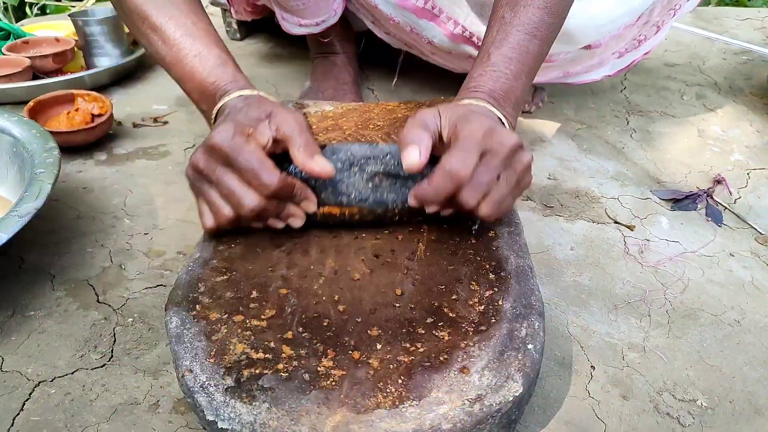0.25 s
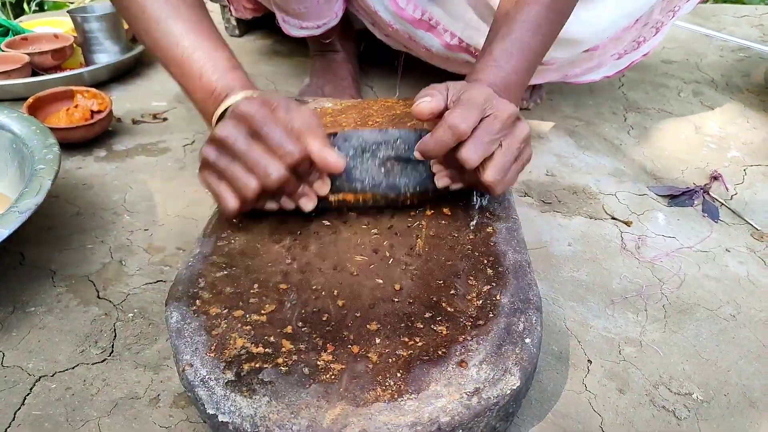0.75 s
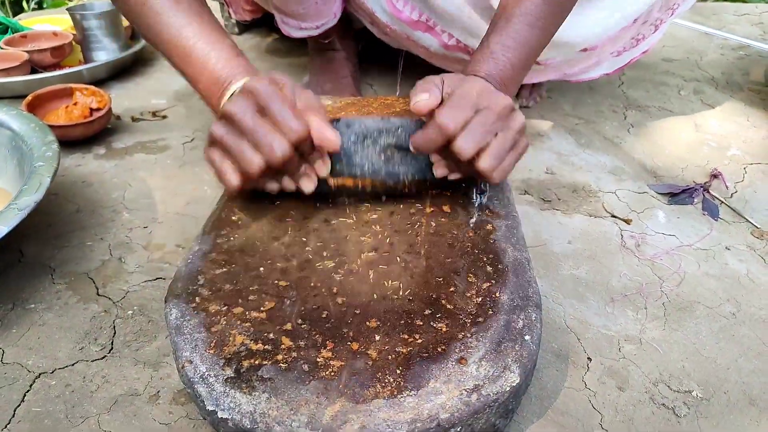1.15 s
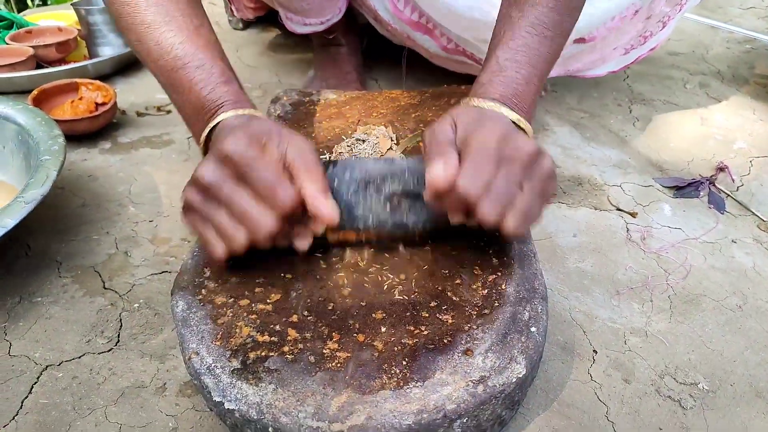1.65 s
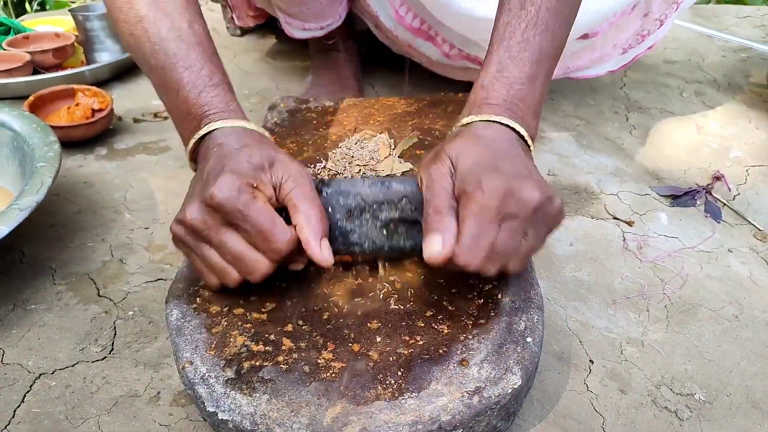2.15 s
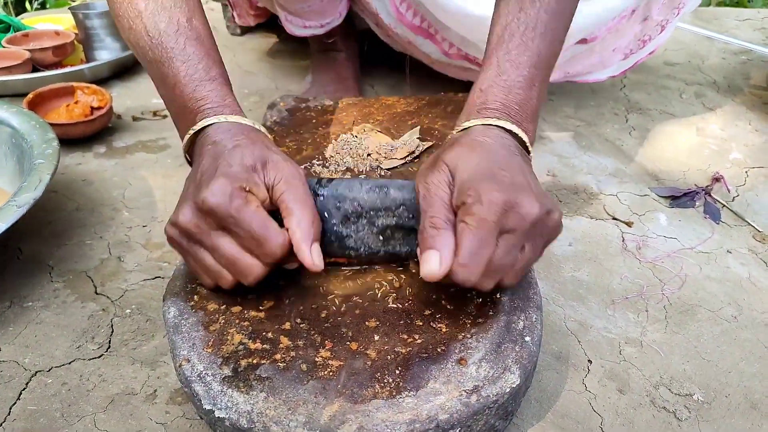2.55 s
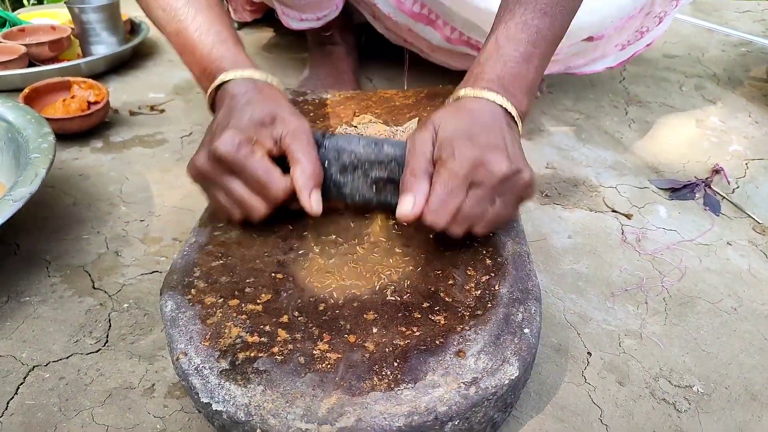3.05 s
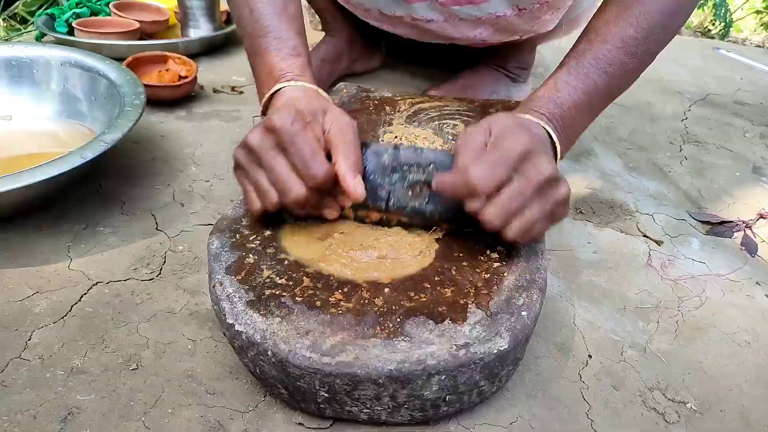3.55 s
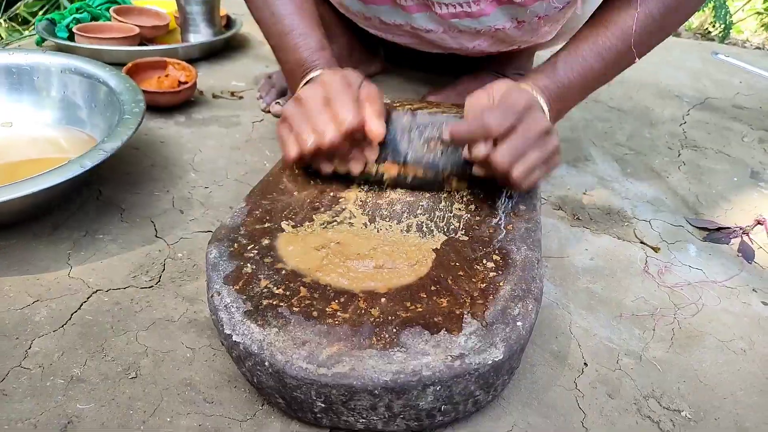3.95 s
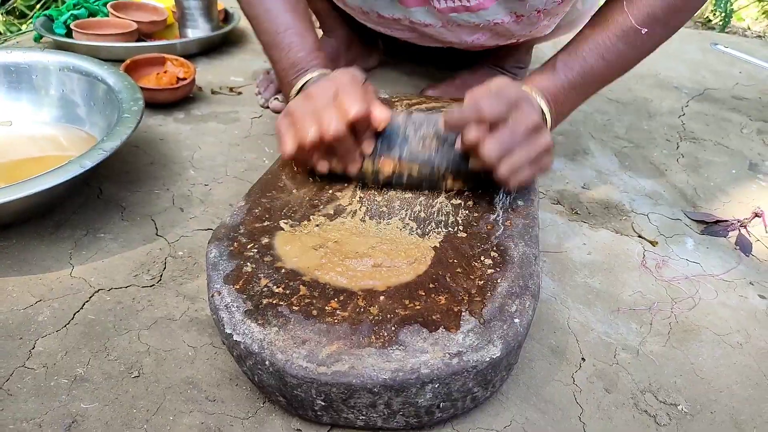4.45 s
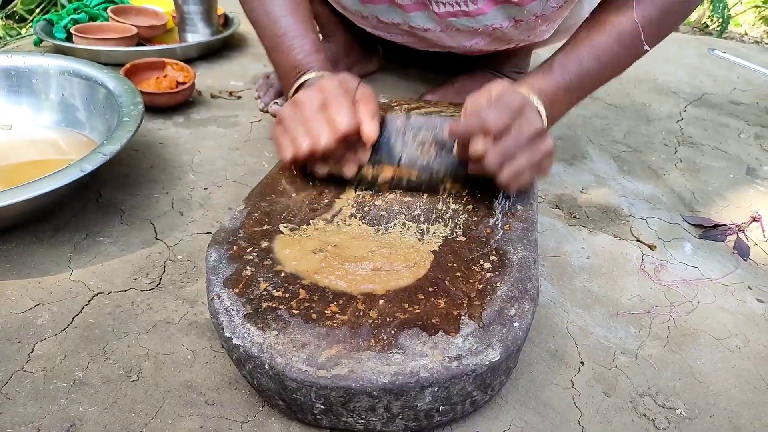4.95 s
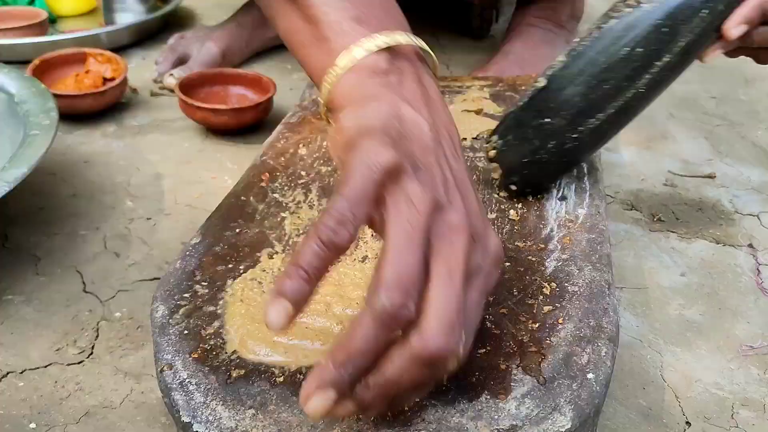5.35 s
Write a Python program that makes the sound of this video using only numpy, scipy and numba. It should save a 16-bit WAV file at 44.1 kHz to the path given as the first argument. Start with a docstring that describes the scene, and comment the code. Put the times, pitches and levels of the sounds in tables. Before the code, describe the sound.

Close up outdoors, a stone roller grinds seeds on a pitted stone slab in quick back-and-forth strokes. Gritty mid-high hiss swells and sinks with each stroke, with hard stony clacks and a hollow ring, over low slab rumble. Later strokes turn slower and wetter, a faint low hum enters, then the sound drops out briefly and returns as wind puffs over faint air.

```python
"""A stone roller is pushed back and forth over a stone slab, close to a phone with two microphone ports.
Coloured noise grains make the grit hiss; lumpier grains drive resonances, so the rubbed stones ring.
The roller skips over the pitted face as short blows into the same modes; the slab rumbles and knocks below.
Behind lie outdoor air as shaped noise, a low hum of sines that joins later, a short silence and puffs of wind."""
import sys
import numpy as np
from scipy import signal
from scipy.fft import rfft, irfft
from scipy.io import wavfile
from scipy.ndimage import uniform_filter1d
from numba import njit

SR = 44100
rng = np.random.default_rng(int(sys.argv[2]) if len(sys.argv) > 2 else 0)


def decibels_to_gain(level_db):
    """Convert a level in decibels to a linear amplitude gain (20 dB per decade)."""
    exponent = np.asarray(level_db, float) / 20
    return 10 ** exponent


def generate_wav(signal):
    """Clip the signal to [-1, 1] and save it as 16-bit WAV at the path in sys.argv[1]."""
    frames = np.transpose(np.atleast_2d(signal))
    scaled = np.clip(frames, -1, 1) * 32767
    pcm = np.round(scaled).astype(np.int16)
    wavfile.write(sys.argv[1], SR, pcm)


N = 247401
T = np.arange(N) / SR
F = np.maximum(np.arange(N // 2 + 1) * SR / N, 1)
SLOW = T[::32]  # moments at which the slow controls are worked out


def unit(x):
    """Scale to rms 1."""
    return x / np.sqrt(np.mean(x ** 2))


def along(table):
    """A (frequency [Hz], value) table read at every frequency, on a log scale."""
    hz, value = np.transpose(table)
    return np.interp(np.log(F), np.log(hz), value)


def curves(table, at=T):
    """A (time [s], value) table as a curve in time."""
    return np.interp(at, *np.transpose(table))


def colour(x, table):
    """Give a flat sound the spectrum of a (frequency [Hz], level [dB]) table, at rms 1."""
    return unit(irfft(rfft(x) * decibels_to_gain(along(table)), N))


@njit
def svf(x, hz, width):
    """Resonance with moving centre and width, gain 1 at the centre."""
    y, b, l = np.empty(len(x)), 0., 0.
    for i in range(len(x)):
        g, k = np.tan(np.pi * hz[i] / SR), width[i] / hz[i]
        v = (b + g * (x[i] - l)) / (1 + g * (g + k))
        b, l, y[i] = 2 * v - b, l + 2 * g * v, k * v
    return y


def band(x, hz, width):
    """One resonance; centre and width are numbers or curves."""
    return svf(x, hz + 0. * x, width + 0. * x)


def modes(x, table, tune=1, damp=0):
    """Ring a set of modes; extra damping [Hz] shortens them without making them louder."""
    out = 0
    for hz, width, db in table:
        out = out + decibels_to_gain(db) * band(x, tune * hz, width + damp) * width / (width + damp)
    return out


def walk(rate):
    """Random levels held 1 / rate s and slewed; spread near 1."""
    k = int(SR / rate)
    return uniform_filter1d(np.repeat(rng.standard_normal(N // k + 1), k), k)[:N]


def grains(spread_db, flutter_db, rate):
    """Crushed grains: noise with some large samples, whose density flutters; one common flutter, two draws."""
    large_db = spread_db * np.minimum(rng.exponential(size=N), 4)
    size = decibels_to_gain(large_db + flutter_db * np.clip(walk(rate), -2, 1.3))
    return size * rng.standard_normal((2, N))


def treble_warble(pair, dip_db, wide_db):
    """Lay a warble over a sound: narrow patches of its treble drop out, wide ones swell and fade."""
    hz, _, spec = signal.stft(pair, SR, nperseg=512)
    field = rng.standard_normal((2,) + spec.shape[1:])
    narrow = unit(uniform_filter1d(uniform_filter1d(field[0], size=2, axis=0), size=6, axis=1))
    wide = unit(uniform_filter1d(uniform_filter1d(field[1], size=14, axis=0), size=8, axis=1))
    treble = np.clip(hz[:, None] / 4000, 0, 1)
    warble_db = treble * (dip_db * np.minimum(narrow, 1.3) + wide_db * wide)
    return signal.istft(spec * decibels_to_gain(warble_db), nperseg=512)[1][:, :N]


# Colour balance of the two ports: (frequency [Hz], left minus right [dB])
PORT_TILT = [(60, 1), (110, 0.5), (200, -4), (380, -2), (700, 2.5), (1290, 2.5), (2380, -2.6), (4400, -4.5),
             (8120, -4), (15000, -9.5)]
# Likeness of the two ports: (frequency [Hz], share of amplitude common to both [0-1])
PORT_LIKENESS = [(30, 0.21), (70, 0.86), (150, 1), (600, 0.78), (1400, 0.96), (2500, 0.18), (5000, 0.21),
                 (12000, 0.05)]


def ports(pair, lag_ms):
    """Left hears the first draw; right hears it later, mixed with an unrelated draw where the ports differ."""
    a, b = rfft(pair)
    common = np.clip(along(PORT_LIKENESS), 0, 1)
    late = a * np.exp(-2j * np.pi * F * lag_ms / 1000)
    right = common * late + np.sqrt(1 - common ** 2) * b
    tilt = along(PORT_TILT) / 2
    return irfft(np.array([a * decibels_to_gain(tilt), right * decibels_to_gain(-tilt)]), N)


# Colour of the outdoor air: (frequency [Hz], relative level per Hz [dB])
AIR_COLOUR = [(12, -39.5), (20, 14), (181, 12), (405, -38.5), (1140, -8.5), (1340, -26), (1590, -24),
              (3370, -15.5), (4970, -11), (6220, -14.5), (7560, -16.5), (13600, -32), (15600, -45.5)]


def outdoor_air():
    """Open-air noise: shaped hiss at a wavering level, with a treble warble laid over it."""
    hiss = treble_warble(rng.standard_normal((2, N)), 8.7, 0.85)
    level_db = -61.5 + 3.5 * walk(19.0)
    return np.array([colour(v, AIR_COLOUR) for v in hiss]) * decibels_to_gain(level_db)


# Partials of the hum: (mean frequency [Hz], relative mean level [dB])
HUM_PARTIALS = [(48.3, 0), (96.6, 7), (193, -9.5)]
# Loudness of the hum: (time [s], level [dB])
HUM_LEVEL = [(3.5, -92), (3.644, -64.5), (3.846, -59.5), (4.36, -57), (4.556, -63.5), (4.742, -55),
             (4.96, -56), (5.27, -54.5), (5.36, -55)]


def low_hum():
    """Three sines whose shared pitch and separate levels waver."""
    turn = 2 * np.pi * np.cumsum(1 + 0.009 * walk(11)) / SR
    hum = unit(sum(decibels_to_gain(db + 4.7 * walk(42)) * np.sin(hz * turn) for hz, db in HUM_PARTIALS))
    return hum * decibels_to_gain(np.interp(T, *np.transpose(HUM_LEVEL), left=-99, right=-99))


# Gust level before panning: (time [s], level [dB])
GUST_LEVEL = [(5.41, -53), (5.472, -69.5), (5.49, -40), (5.542, -60), (5.562, -58), (5.61, -54)]
# Single puffs before panning:
# (time [s], level [dB], time scale [ms], signed factor on the peak: positive pushes, negative pulls)
WIND_PUFFS = [(5.481, -38.5, 6.8, -1.36), (5.518, -51.5, 1.7, -0.89), (5.57, -41, 3.9, 1)]


def wind():
    """Wind buffets each port on its own as low noise, with single puffs on both, the right one harder."""
    gust_colour = [(20, -7.0), (50, -4.5), (100, 9.5), (250, -21.5), (600, -61.5)]  # (Hz, dB per Hz)
    gusts = np.array([colour(v, gust_colour) for v in rng.standard_normal((2, N))])
    gusts = gusts * decibels_to_gain(np.interp(T, *np.transpose(GUST_LEVEL), left=-99))
    for at, db, ms, factor in WIND_PUFFS:
        # one push or pull of air on the membrane and its rebound
        u = (T - at) / ms * 1000
        gusts = gusts + factor * decibels_to_gain(db) * (1 - 2 * u ** 2) * np.exp(-u ** 2)
    left_minus_right_db = -27
    return gusts * decibels_to_gain(np.array([[1], [-1]]) * left_minus_right_db / 2)


# Strokes of the roller, each ending where the next begins:
# (start [s], grit loudest [s], coarse level [dB], middle level [dB], fine level [dB])
STROKES = [(-0.04, 0.27, -43, -52, -65.5), (0.352, 0.412, -48, -65, -76), (0.455, 0.511, -44, -53, -52.5),
           (0.65, 0.798, -50.5, -97.5, -64.5), (0.86, 0.909, -44.5, -50.5, -56.5),
           (1.07, 1.199, -46.5, -53, -75.5), (1.27, 1.338, -41.5, -51.5, -56.5),
           (1.49, 1.597, -55, -60.5, -69), (1.68, 1.744, -43.5, -53, -55.5),
           (1.88, 2.005, -45.5, -58.5, -66.5), (2.08, 2.131, -40, -47, -55), (2.28, 2.384, -45.5, -59, -67),
           (2.49, 2.547, -39, -49, -54), (2.69, 2.847, -49, -62.5, -64.5), (2.9, 2.978, -40.5, -46, -54),
           (3.11, 3.238, -45, -54.5, -59), (3.31, 3.4, -37.5, -46.5, -54), (3.52, 3.627, -49, -60.5, -60.5),
           (3.75, 3.882, -73, -57.5, -55), (3.98, 4.048, -54, -56.5, -62), (4.23, 4.363, -65, -56.5, -54.5),
           (4.47, 4.549, -44.5, -50, -65.5), (4.7, 4.845, -54, -53.5, -59),
           (4.96, 5.069, -49.5, -53.5, -64), (5.2, 5.298, -55.5, -54, -60.5),
           (5.42, 5.605, -56, -69.5, -62)]
LAST_END_S = 5.75


def stroke_turns():
    """Moments [s] at which the roller turns round, with the end of the last stroke."""
    return np.append(np.transpose(STROKES)[0], LAST_END_S)


def speed(loudest):
    """Roller speed 0-1 and stroke number: at rest at each turn, fastest at the given moment of each stroke."""
    turns = stroke_turns()[:len(loudest) + 1]
    knots = np.append(np.transpose([turns[:-1], loudest]).ravel(), turns[-1])
    phase = np.interp(SLOW, knots, np.arange(len(knots)) / 2)
    return np.abs(np.sin(np.pi * phase)), np.minimum(phase.astype(int), len(loudest) - 1)


# How peaked the strokes are; low values hold their level, as in the long first stroke and on wet paste:
# (time [s], share of the speed power [0-1])
STROKE_PEAKEDNESS = [(0, 0.25), (.33, 0.082), (.5, 0.6), (1.9, 1), (2.1, 0.82), (3.5, 0.82), (4.0, 0.68),
                     (4.7, 0.49), (5.3, 0.55)]
# Coarse grit while the roller turns round; it sinks later on as the seeds become paste: (time [s], level [dB])
RESTING_LEVEL = [(0, -71), (.44, -50.5), (1.0, -55), (1.6, -49.5), (1.9, -54), (3.3, -55), (3.6, -54.5),
                 (4.2, -65), (5.3, -68), (5.45, -74)]
STICK = 0.12  # below this share of full speed the roller sticks, leaving only the resting level


def layer(loudest, db, law):
    """Gain of a rubbing sound: stroke level times a power of speed, over a resting level; law is (power, dB)."""
    power, rest_db = law
    v, k = speed(loudest)
    v = np.maximum(v - STICK, 0) / (1 - STICK)
    moving = decibels_to_gain(db[k]) * v ** (power * curves(STROKE_PEAKEDNESS, SLOW))
    resting = decibels_to_gain(curves(RESTING_LEVEL, SLOW) + rest_db)
    return np.interp(T, SLOW, moving + resting)


# Rubbed stones, one row for each stroke:
# (loudest [s], roller ring level [dB], hollow tone level [dB], hollow tone pitch before its sag [Hz])
RUBBED_STONES = [(.24, -42.5, -36, 820), (.4, -53, -68, 642), (0.542, -50.5, -43, 790),
                 (0.748, -44.5, -50.5, 710), (.93, -51.5, -64, 700), (1.17, -57, -68, 750),
                 (1.36, -61, -60, 700), (1.59, -54.5, -64, 600), (1.75, -53, -58, 704),
                 (2.001, -40.5, -47, 756), (2.15, -40, -46.5, 800), (2.39, -54.5, -77, 726),
                 (2.563, -48, -49, 766), (2.81, -53, -63, 610), (2.999, -47.5, -55, 714),
                 (3.22, -57, -68, 667), (3.41, -49.5, -53, 746), (3.66, -65, -58, 546),
                 (3.889, -44, -60, 560), (4.098, -44.5, -48.5, 792), (4.38, -47.5, -60, 637),
                 (4.601, -40.5, -50, 865), (4.821, -39, -47, 672), (5.082, -47.5, -49, 830),
                 (5.311, -43, -48, 635), (5.55, -91, -83, 700)]
HOLLOW_WIDTH_HZ = 100  # while the roller flies


def hollow_pitch():
    """The hollow tone between the stones: highest in mid-stroke, lower at the turns, more so in long strokes."""
    turns = stroke_turns()
    v, k = speed((turns[1:] + turns[:-1]) / 2)
    sag = .7 * np.diff(turns)[k] * (1 - v)  # share of the pitch, .7 for each second a stroke lasts
    hz = np.transpose(RUBBED_STONES)[3][k] * (1 - sag)
    return np.interp(T, SLOW, uniform_filter1d(hz, size=25))


# Slab rocking on the ground, one row for each stroke but the last:
# (loudest [s], rumble level [dB], rumble pitch [Hz])
SLAB_ROCKING = [(0.05, -62, 178), (0.4, -60, 176.6), (0.549, -53.5, 183.5), (0.786, -55.5, 192),
                (0.982, -55, 181), (1.192, -47, 174.4), (1.384, -51, 173.4), (1.582, -45, 162.5),
                (1.8, -44.5, 185), (1.977, -37.5, 170), (2.195, -46.5, 187), (2.361, -43.5, 162),
                (2.609, -45, 165), (2.797, -43, 163), (3.013, -48, 175), (3.203, -53, 179),
                (3.416, -47.5, 168.5), (3.655, -40, 145), (3.857, -49, 184), (4.089, -45.5, 172.3),
                (4.388, -48, 185), (4.567, -48.5, 168), (4.842, -58, 184), (5.088, -45.5, 180.3),
                (5.304, -61.5, 187)]
# Slab knocking on the ground: (time [s], peak level [dB], fade time scale [s])
SLAB_KNOCKS = [(.02, -47.5, 0.035), (.26, -52, 0.062), (.55, -50.5, 0.025), (.77, -61, 0.035),
               (1.42, -58.5, .03), (1.5, -61.5, .06), (1.97, -53, 0.079), (2.75, -86, .03),
               (3.612, -41.5, 0.064), (3.68, -56, 0.023), (4.08, -59, 0.032), (4.39, -61, 0.055),
               (5.06, -71, 0.041), (5.32, -61.5, 0.055)]


def slab(bumps):
    """Dragging grains drive a moving low resonance as the slab rocks; bumps drive a fixed one as it knocks."""
    loudest, rumble_db, slab_hz = np.transpose(SLAB_ROCKING)
    rumble, rumble_hz = layer(loudest, rumble_db, (3.44, -21.5)), np.interp(T, loudest, slab_hz)
    knock = 0
    for at, db, fall in SLAB_KNOCKS:
        scale_s = np.where(SLOW < at, 0.013, fall)  # quick rise, slower fall
        knock = knock + decibels_to_gain(db) * np.exp(-((SLOW - at) / scale_s) ** 2)
    knock = np.interp(T, SLOW, knock) + decibels_to_gain(-33.5) * rumble  # a little knocking under all the rumble
    knock_mode = [(314.6, 74, 0)]  # (Hz, width Hz, dB)
    out = np.zeros((2, N))
    for k, drag in enumerate(grains(1.9, 0.85, 35)):
        out[k] = rumble * unit(band(band(drag, rumble_hz, 53), rumble_hz, 36.4))
        out[k] += knock * unit(modes(modes(bumps[k], knock_mode), knock_mode))
    return out


def faint_skips():
    """Small skips at random moments, loudest while the roller is fast; rows laid out as in ROLLER_SKIPS."""
    count = int(4 * N / SR)  # 4 per second
    at, size = rng.uniform(0, STROKES[-1][0], count), rng.standard_normal((count, 3))
    v = np.interp(at, SLOW, speed(np.transpose(STROKES)[1])[0])
    db = -45 + 3. * size[:, 0] + 20 * np.log10(v + .01)
    hollow_db, upper_db = -4 + 6 * size[:, 1], -15 + 6 * size[:, 2]
    return [(s, d, low, high, 7) for s, d, low, high in zip(at, db, hollow_db, upper_db)]


# Roller skips: (time [s], main ring peak [dB], hollow tone over it [dB], upper modes over it [dB], flight [ms])
ROLLER_SKIPS = [(.023, -39, 11, -36, 11), (.072, -42, -18, -22, 6.5), (.496, -22.5, -10, 4, 7.5),
                (.52, -21, -3.5, -2, 66), (.54, -27, 2, -15, 15), (.559, -10, -1.5, -0.5, 12.5),
                (.706, -43.5, 11, -34, 21), (.743, -49, 8, -22, 2.7), (.761, -32.5, -6, -35, 66),
                (.781, -38.5, 12, -21, 7.2), (.979, -28.5, 2, -24, 22), (1.048, -33, 11, 12, 8.7),
                (1.317, -40.5, -19, -16, 26), (1.441, -42.5, 11.5, -26, 13), (1.962, -29, -5, -29, 12),
                (1.981, -23.5, -38, -26, 7.5), (2.016, -18, -2, -69, 8.7), (2.121, -18.5, -4.5, -6, 8.9),
                (2.141, -9, -16, -6.5, 3.6), (2.17, -18, -6, -14, 6.4), (2.199, -29.5, 6.2, -37, 12),
                (2.467, -39.5, -4, -17, 12), (2.538, -14, -50, -3, 15), (2.566, -29.5, 3.5, -15, 6.7),
                (2.682, -45.5, 0, 4, 11), (2.757, -45, 11, 22, 14), (2.863, -33, -1, -7, 11.6),
                (2.982, -20, -9, 0, 1.8), (3.289, -23, -11, -48, 12), (3.373, -14, -9.5, -12, 18),
                (3.414, -27.5, -20, -25, 9), (3.44, -46, 1, -9, 4.9), (3.637, -42, 4, 5, 12),
                (3.657, -41.5, 3.5, -15, 31), (3.687, -42, 9, -18, 24), (3.881, -39, -2, -40, 7.6),
                (3.905, -39.5, 9.5, 7.5, 20.5), (4.048, -12.5, -12, -10.5, 17), (4.081, -25.5, -2, -41, 12),
                (4.108, -18.5, -3, -16.5, 9.9), (4.322, -36, -30.5, -18, 8.1),
                (4.377, -21.5, -6, -19.5, 16), (4.4, -26, -5, -39, 13), (4.544, -31, 3, -22, 39),
                (4.573, -14.5, -6, -30.5, 13.5), (4.629, -49, -13.5, -31, 18),
                (4.752, -50.5, 11, -23.5, 5.5), (4.859, -40.5, 6, -26.5, 18), (5.024, -34.5, 5, -37, 10.6),
                (5.064, -23, -25, -37, 8.2), (5.084, -21, -8, -48, 11), (5.126, -34.5, 4, -23, 26),
                (5.305, -46.5, 18.5, -15, 14), (5.325, -24.5, -38, -16.5, 9.7)]
# Main modes of the roller, before tuning and damping: (frequency [Hz], width [Hz], relative level [dB])
ROLLER_MODES = [(1342, 42, 0), (975, 90, -18), (1660, 140, -24)]
# Upper modes of the roller, before tuning and damping: (frequency [Hz], width [Hz], relative level [dB])
ROLLER_UPPER_MODES = [(2150, 200, -8), (2470, 180, 0), (3340, 100, 3), (3900, 250, -12)]
SKIP_HZ, SKIP_SCATTER = 1336, .015  # mean pitch of the thrown roller, and the share by which the grip shifts it
BLOW_WIDTH_HZ = 840  # band around the main ring that a blow excites
LANDED_WIDTH_HZ = 110.  # extra damping once the roller is pressed back on the slab


def skips():
    """A ridge throws the roller up: it rings freely while it flies and is damped when it lands."""
    hollow = hollow_pitch()
    span = 1800  # samples
    t = np.arange(span) / SR
    rows = faint_skips() + ROLLER_SKIPS
    rough = rng.standard_normal((len(rows), 2 * span + 1))
    out = np.zeros((2, N + span))
    for (at, db, hollow_db, upper_db, ms), draw in zip(rows, rough):
        noise, hz = draw[1:].reshape(2, span), SKIP_HZ * (1 + SKIP_SCATTER * draw[0])
        flight = max(ms, 1) / 1000
        # a gritty blow of a millisecond or two, then weaker chatter until it lands
        blow = t / 0.0009 * np.exp(-t / 0.0012)
        chatter = 0.18 * np.exp(-(t / flight) ** 2)
        # stone on grit is a blunt contact
        push = [band(band(v, 1500, 2200), 1500, 2200) for v in noise * (blow + chatter)]
        damp = LANDED_WIDTH_HZ * np.clip(4 * (t / flight - 1), 0, 1)
        i = max(int((at - .0012) * SR), 0)
        for k in range(2):
            main = band(modes(push[k], ROLLER_MODES, hz / ROLLER_MODES[0][0], damp), hz, BLOW_WIDTH_HZ)
            low = modes(push[k], [(hollow[i], HOLLOW_WIDTH_HZ, 0)], 0.93, damp)
            upper = modes(push[k], ROLLER_UPPER_MODES, 0.97, damp)
            main, low, upper = (v / np.abs(v).max() for v in (main, low, upper))
            out[k, i:i + span] += decibels_to_gain(db) * (main + decibels_to_gain(hollow_db) * low + decibels_to_gain(upper_db) * upper)
    return out[:, :N]


def rubbed_stones(bumps):
    """Bumps ring the roller, damped by the pressing hands, and the moving hollow tone between the stones."""
    loudest, ring_db, hollow_db, _ = np.transpose(RUBBED_STONES)
    ring, hollow = layer(loudest, ring_db, (4.18, -8.5)), layer(loudest, hollow_db, (3.42, -22.5))
    hollow_hz, wide = hollow_pitch(), 2.37 * HOLLOW_WIDTH_HZ
    out = np.zeros((2, N))
    for k in range(2):
        out[k] = ring * unit(modes(bumps[k], ROLLER_MODES, 0.98, damp=25.))
        out[k] += hollow * unit(band(band(bumps[k], hollow_hz, wide), hollow_hz, wide))
    return out


# Colour of the coarse grit: (frequency [Hz], relative level per Hz [dB])
COARSE_COLOUR = [(700, -51), (1100, -11), (1700, -13), (1900, -4.5), (2150, 3), (2600, 1.5), (2970, 0.5),
                 (3380, 3), (3700, -2.5), (4600, -9.5), (4950, -27.5), (5500, -65.5)]
# Colour of the middle grit: (frequency [Hz], relative level per Hz [dB])
MIDDLE_COLOUR = [(4900, -60), (5200, -9), (5600, -6.5), (6200, -0.5), (6800, -7.5), (7300, -36),
                 (7800, -23.5)]
# Colour of the fine grit: (frequency [Hz], relative level per Hz [dB])
FINE_COLOUR = [(4470, -3), (7600, -1.5), (8670, -5), (9900, -5), (10700, -6.5), (12400, -10.5), (13400, -8),
               (15600, -20.5)]


def grit_hiss():
    """Crushed grains hiss in three colours, each growing with roller speed by its own law; the treble warbles."""
    _, loudest, coarse_db, middle_db, fine_db = np.transpose(STROKES)
    coarse = layer(loudest, coarse_db, (4.05, 0.))
    middle = layer(loudest, middle_db, (4.2, -17.5))
    fine = layer(loudest, fine_db, (2.6, -20))
    out = np.zeros((2, N))
    for k, sand in enumerate(treble_warble(grains(1.8, 2.54, 53), 7.9, 1.47)):
        out[k] = coarse * colour(sand, COARSE_COLOUR) + middle * colour(sand, MIDDLE_COLOUR)
        out[k] += fine * colour(sand, FINE_COLOUR)
    return out


# Lumpiness of the rubbing, as flutter of the bumps that ring the stones: (time [s], flutter depth [dB])
BUMP_FLUTTER = [(0, 1.5), (.4, 1.5), (.65, 5), (2.0, 4), (3.6, 5.5), (4.6, 4), (5.3, 4)]


def strokes():
    """Rubbing: grit hiss, ringing stones and slab; the same bumps drive the stones and the slab's knocks."""
    bumps = grains(4.96, curves(BUMP_FLUTTER), 70)
    return grit_hiss() + rubbed_stones(bumps) + slab(bumps)


# Where the contact between the stones sits: (time [s], left minus right [dB])
CONTACT_SWAY = [(0, 3), (.5, 0.3), (1.5, 0.4), (2.0, 1.3), (3.4, 1), (4.1, 2.5), (4.5, 2), (5.1, 3),
                (5.33, 2.2)]
# the right port hears the stones later, less so once the phone has turned
LAG_BEFORE_MS, LAG_AFTER_MS, TURNED_S = .14, .06, 3.75


def scene():
    """Stones close by, in the open."""
    stones = skips() + strokes()
    sway = decibels_to_gain(np.array([1, -1])[:, None] * curves(CONTACT_SWAY) / 2)
    before, after = ports(stones, LAG_BEFORE_MS), ports(stones, LAG_AFTER_MS)
    background = ports(outdoor_air() + low_hum(), 0.039)
    return sway * np.where(T < TURNED_S, before, after) + background + wind()


def top_cut(x):
    """Nothing passes above the cut-off."""
    return signal.sosfilt(signal.butter(12, 15740, fs=SR, output="sos"), x)


# Everything drops out and fades back: (time [s], level [dB])
DROPOUT = [(5.333, -0.5), (5.339, -39), (5.35, -80), (5.4, -62), (5.42, -20), (5.47, -2)]


def record(dry):
    """The whole sound drops out once, briefly."""
    mix = dry * decibels_to_gain(curves(DROPOUT))
    return top_cut(mix)


dry = scene()
out = record(dry)
generate_wav(out)
```